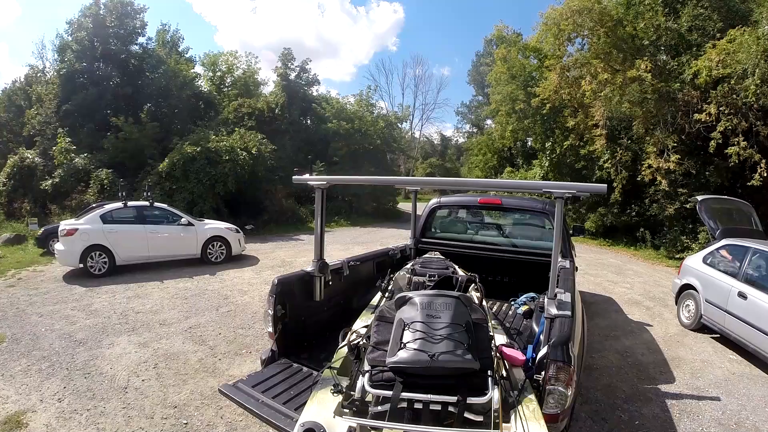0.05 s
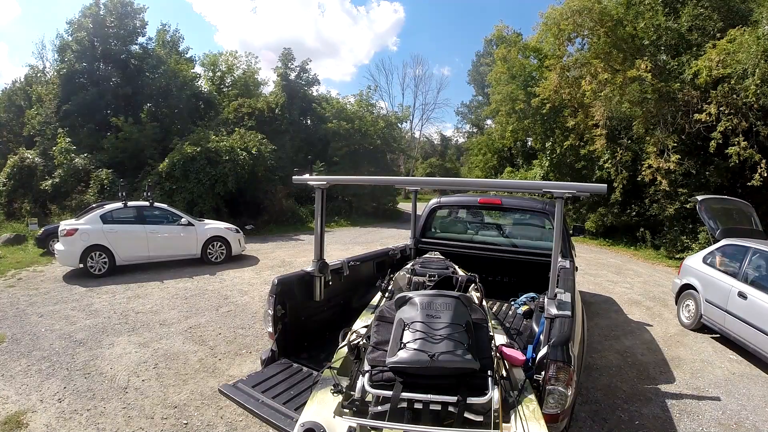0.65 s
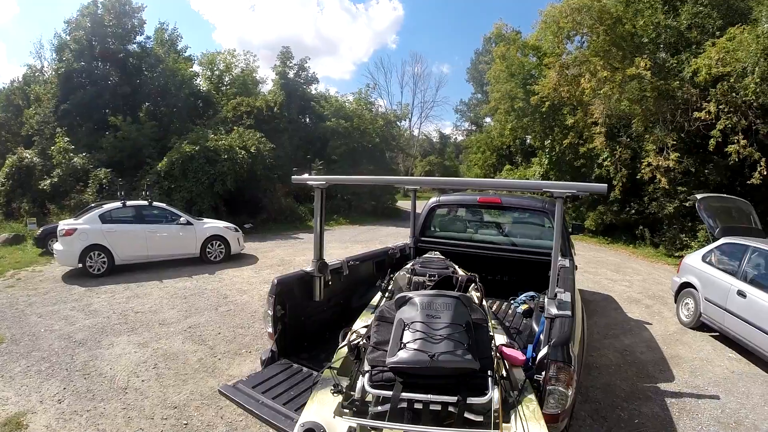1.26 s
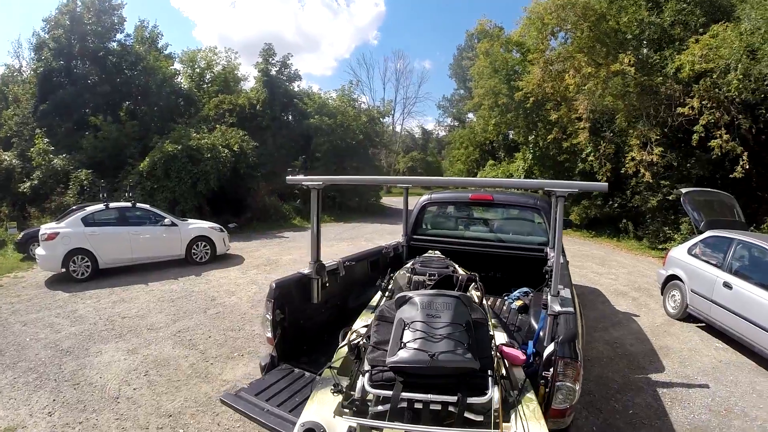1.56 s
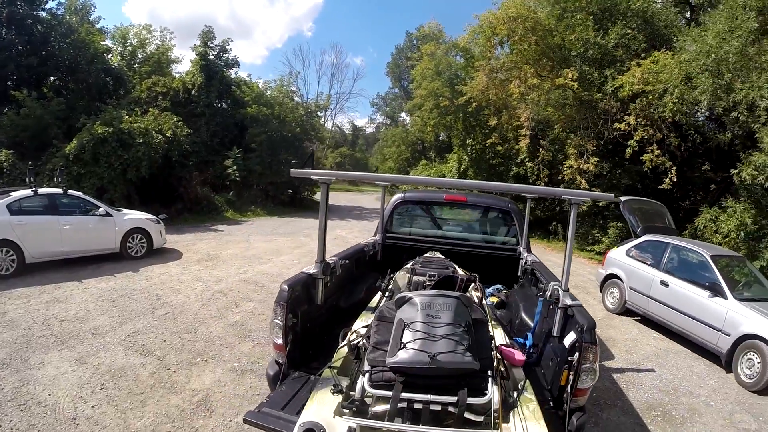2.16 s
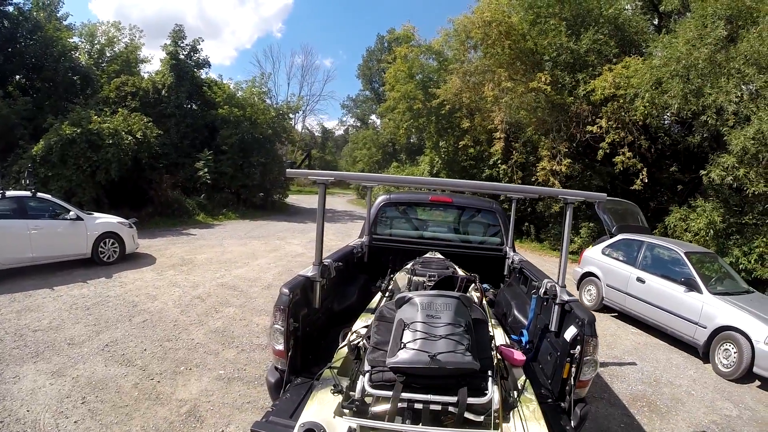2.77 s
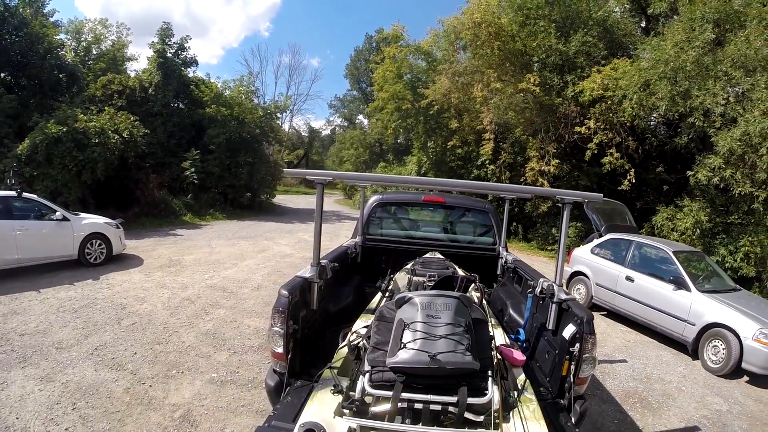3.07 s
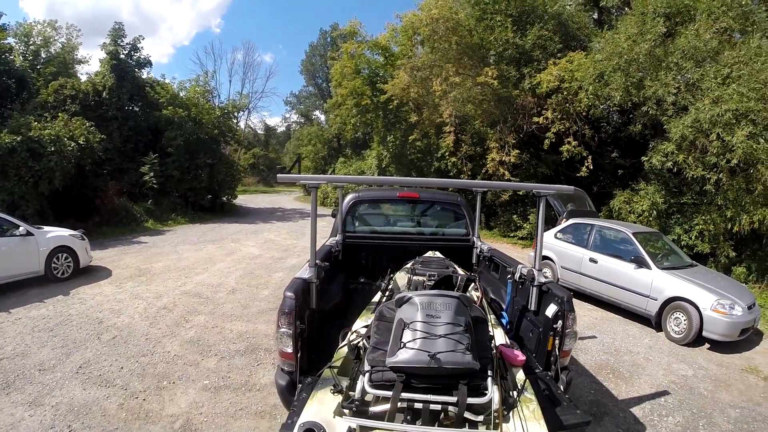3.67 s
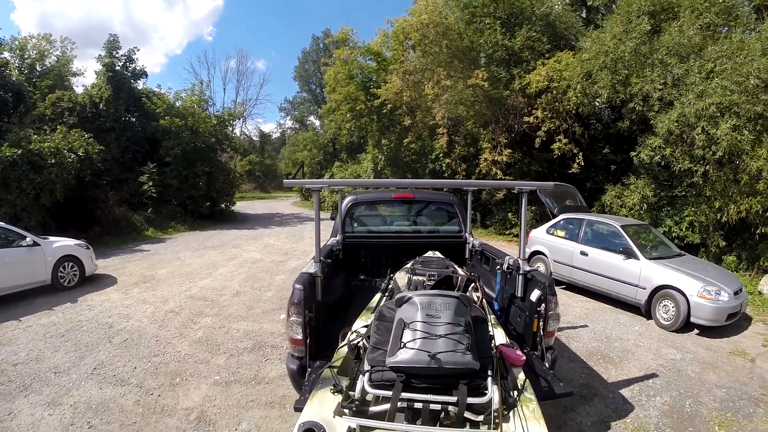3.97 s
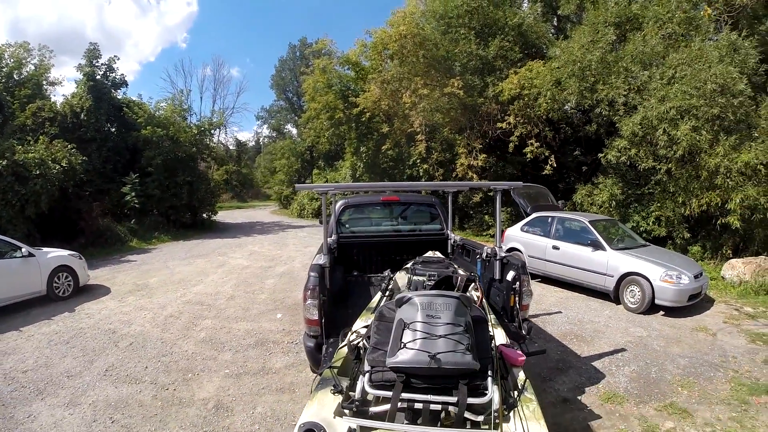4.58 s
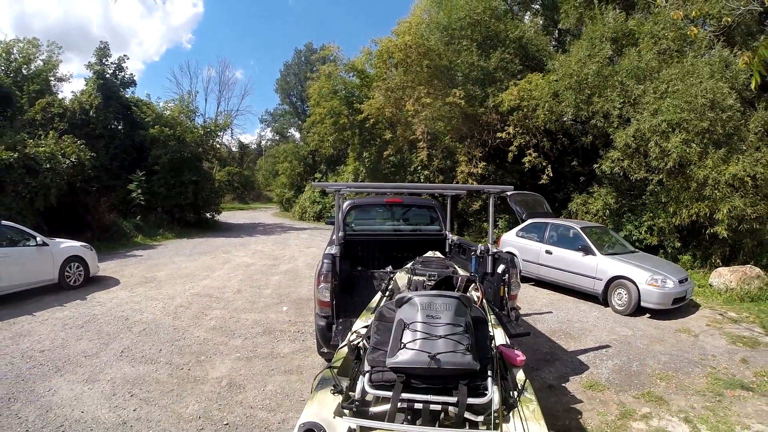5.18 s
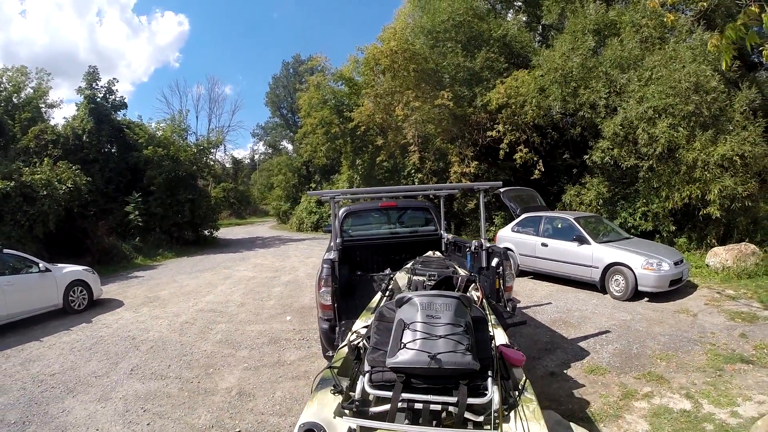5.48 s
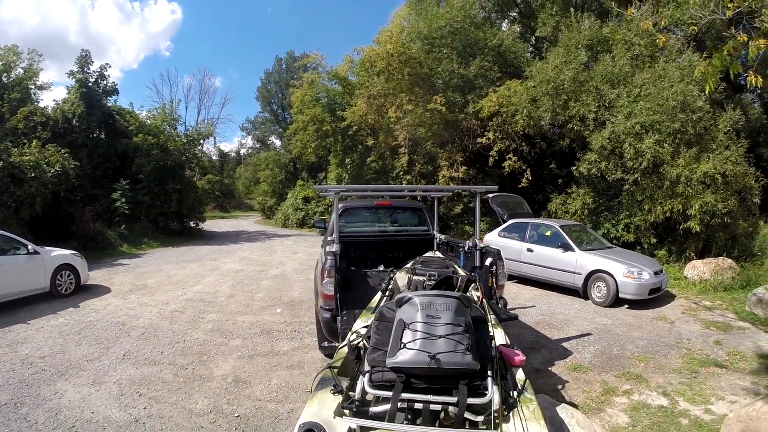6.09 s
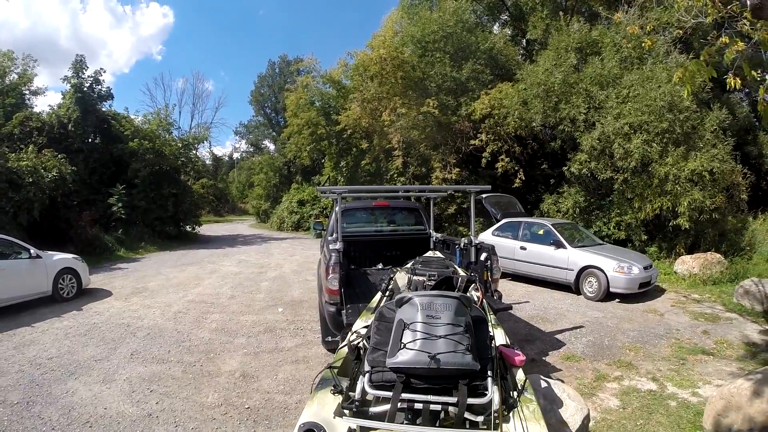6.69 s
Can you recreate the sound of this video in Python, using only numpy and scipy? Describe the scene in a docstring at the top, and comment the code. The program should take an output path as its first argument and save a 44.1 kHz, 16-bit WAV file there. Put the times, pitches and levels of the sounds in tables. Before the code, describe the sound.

A hollow plastic kayak is dragged off a pickup bed, rumbling and scraping with uneven bumps and knocks.

```python
"""A plastic kayak is pulled backwards off a pickup's ribbed bed, heard from its hollow hull.
Over a faint hiss come a few soft bumps, a clinking buckle and a thin squeak. Near 2 s a short tug
sets the hull booming and the deck fittings cracking. At 3.3 s the keel catches and rasps, then the
long pull begins: grit scrapes, the thin walls sing, the hull groans and loose gear knocks.
After 5 s the slide eases off, and a last hard bump lands near 6.8 s."""
import sys
import numpy as np
from scipy import signal
from scipy.fft import rfft, irfft
from scipy.io import wavfile
from scipy.ndimage import uniform_filter1d

SR = 44100
rng = np.random.default_rng(int(sys.argv[2]) if len(sys.argv) > 2 else 0)


def store_wav(level_fs):
    """Save 16-bit WAV to argv[1]."""
    pcm = np.round(np.clip(np.atleast_2d(level_fs), -1, 1) * 32767)
    wavfile.write(sys.argv[1], SR, pcm.T.astype(np.int16))


N = 301644

# colour of the background hiss: (frequency [Hz], relative level [dB])
HISS_COLOUR = [(60, 13.5), (280, -3.5), (420, -4), (750, -12), (1050, -10.5), (1900, -12), (2900, -16),
               (3500, -18), (6500, -23), (8200, -27), (12500, -31.5), (15000, -44)]
# fader ride of the hiss: (time [s], level [dB])
HISS_LEVEL = [(0.0, -51), (1.99, -51), (2.05, -63.5), (2.35, -58), (2.75, -51), (6.84, -50.5)]
# thin tones in the hiss: (frequency [Hz], width [Hz], highest level [dB])
HISS_TONES = [(2580, 200, -72.5), (5005, 77, -77), (10110, 230, -81)]
# a small metal buckle clinks: (time [s], peak [dB])
BUCKLE_HITS = [(0.0774, -44), (0.571, -55), (0.635, -40)]
# the buckle's ring: (frequency [Hz], relative level [dB], t60 [s])
BUCKLE_MODES = [(2200, -10, 0.085), (2540, -0.5, 0.05)]
# sharp, dry ticks at the hardest jolts: (time [s], peak [dB])
JOLT_TICKS = [(1.956, -33), (1.975, -33), (1.997, -30.5), (2.012, -46), (2.021, -30), (6.76, -34.5)]
# ring of the thin hull walls: (frequency [Hz], width [Hz], relative level [dB])
WALL_TONES = [(562, 65, -1), (1013, 85, 0.5), (1860, 98, -9), (2026, 40, -9.5), (2520, 110, -15)]
# how strongly the walls sing: (time [s], relative level [dB])
WALL_LEVEL = [(0.62, -81), (0.645, -51), (0.76, -70), (1.25, -72.5), (1.7, -46.5), (2.04, -49.5),
              (2.15, -55.5), (2.9, -65.5), (3.5, -47), (4.0, -38), (4.3, -48.5), (4.62, -41.5), (4.9, -42),
              (5.25, -54), (6.3, -59.5), (6.7, -60)]
# the keel bites and groans: (crest time [s], swell time [s], pitch [Hz], crest level [dB])
KEEL_GROANS = [(1.687, 0.088, 259, -31.5), (1.739, 0.015, 1860, -39), (1.782, 0.025, 477, -34.5),
               (1.819, 0.062, 242, -29), (1.944, 0.022, 3330, -51.5), (2.032, 0.047, 397, -35),
               (2.511, 0.043, 174, -20), (2.518, 0.044, 2020, -54), (2.519, 0.034, 3240, -56.5),
               (3.21, 0.11, 280, -41.5), (3.491, 0.048, 2530, -42.5), (3.548, 0.017, 2150, -37.5),
               (3.669, 0.027, 1880, -41.5), (3.913, 0.078, 960, -30.5), (3.914, 0.11, 1950, -38),
               (4.003, 0.085, 152, -17), (4.07, 0.11, 1840, -42.5), (4.256, 0.06, 1850, -49.5),
               (4.33, 0.072, 142, -16), (4.679, 0.041, 336, -29), (4.855, 0.016, 860, -27),
               (4.876, 0.071, 1900, -42), (5.031, 0.031, 1890, -42), (5.5, 0.14, 166.5, -28.5),
               (6.182, 0.17, 2260, -55)]
# the keel catches and rasps: (time [s], hold [s], drive [dB])
KEEL_RASPS = [(1.714, 0.011, -46), (1.723, 0.014, -44.5), (3.324, 0.0045, -42), (3.343, 0.0068, -40),
              (3.363, 0.011, -38), (3.387, 0.042, -38), (3.447, 0.08, -37), (5.268, 0.0082, -46.5),
              (5.549, 0.065, -49.5), (5.73, 0.071, -53), (6.463, 0.026, -47.5)]
# firmness of the slide, a short tug then the long pull: (time [s], relative level [dB])
SCRAPE_LEVEL = [(1.15, -59.5), (1.4, -57), (1.74, -38), (1.86, -46), (2.08, -52), (2.8, -58), (3.25, -49.5),
                (3.53, -30.5), (3.65, -35), (3.82, -36.5), (3.9, -33.5), (4.1, -33), (4.25, -41.5),
                (4.5, -35), (4.64, -33.5), (4.72, -42), (4.8, -30), (4.89, -30.5), (4.97, -44), (5.04, -39),
                (5.15, -39.5), (5.21, -41.5), (5.45, -46.5), (5.6, -45), (5.86, -54.5), (6.2, -45.5),
                (6.48, -45.5), (6.72, -53)]
# bright grit on top of the scrape: (time [s], relative level [dB])
GRIT_LEVEL = [(1.8, -21), (2.8, -4), (3.55, -23.5), (3.8, -14.5), (4.3, -18.5), (4.9, -23), (6.4, -18.5)]
# groups of hull modes that the scrape feeds: (band edge [Hz])
SCRAPE_EDGES = [386, 694, 1340, 1610, 2270]
# stiff deck fittings: (frequency [Hz], base level [dB], base t60 [s])
FITTING_MODES = [(1176, 13.5, 0.06), (1880, 6.5, 0.024), (2084, 1, 0.041), (2790, -2, 0.0078),
                 (3000, -7.5, 0.013), (4120, -22, 0.0096), (6620, -38.5, 0.0097)]
# hard knocks of hull and gear: (time [s], hull ring peak [dB], fitting crack peak [dB])
HARD_KNOCKS = [(0.094, -57, -43), (0.168, -64.5, -35.5), (0.634, -34.5, -45), (0.642, -30, -44),
               (1.897, -27.5, -50), (1.915, -25.5, -35), (1.973, -22, -43.5), (2.0139, -16.5, -14),
               (2.058, -43, -51), (2.747, -37, -44.5), (3.613, -23, -45), (3.76, -28.5, -34),
               (3.912, -17, -41), (4.313, -28, -50), (4.585, -29, -44), (4.657, -33, -50),
               (4.838, -22.5, -43.5), (4.890, -20, -40), (5.009, -22, -47), (5.043, -28.5, -47),
               (5.112, -29, -53), (6.7432, -31, -39), (6.7563, -21, -27), (6.769, -31.5, -38)]
# the hull drops against the bed: (time [s], peak [dB], top of the thud's band [Hz])
HULL_BUMPS = [(0.077, -21, 41), (0.078, -27, 152), (0.572, -20, 111), (0.637, -18, 243), (0.66, -21, 111),
              (1.244, -17, 151), (1.638, -11.5, 102), (1.662, -5, 179), (1.715, -5, 65.7),
              (1.807, -3.5, 96), (1.896, -1, 153), (2.014, -3.5, 336), (2.472, -17, 257),
              (2.568, -16.5, 76), (2.671, -20.5, 62), (2.923, -21.5, 152), (3.352, -8.5, 130),
              (3.392, -4.5, 218), (3.462, -5, 239), (3.623, -5.5, 192), (3.724, -8, 140),
              (3.741, -4.5, 158), (3.768, -10.5, 110), (4.058, -3.5, 171), (4.099, -7.5, 107),
              (4.163, -9, 130), (4.325, -9, 135), (4.418, -13.5, 74.6), (4.481, -11, 99), (4.616, -10, 110),
              (4.765, -13.5, 161), (4.857, -1.5, 164), (4.899, -5.5, 137), (5.154, -16, 70),
              (5.273, -10.5, 102), (5.602, -13.5, 163), (6.171, -14, 117), (6.341, -15.5, 154),
              (6.746, -10.5, 197), (6.763, -1.5, 173)]
# the hull's weight shaking on its support: (time [s], relative level [dB])
RUMBLE_LEVEL = [(0.08, -38), (0.33, -56), (0.55, -68), (0.62, -28), (0.86, -47.5), (1.19, -50), (1.28, -36),
                (1.61, -21), (1.68, -16), (2.0, -12), (2.11, -20.5), (2.22, -29), (2.33, -30),
                (2.53, -24.5), (2.71, -32.5), (2.77, -35), (2.98, -33), (3.1, -32), (3.42, -17.5),
                (3.58, -18), (4.1, -20), (4.73, -23), (4.9, -17), (5.22, -28.5), (5.45, -26), (5.97, -31),
                (6.25, -27.5), (6.7, -31)]
# resonances of the hollow hull: (frequency [Hz], width [Hz], gain [dB])
HULL_MODES = [(45.7, 8.4, 4), (62.6, 14, 4), (86.4, 41, -5), (117.4, 15, -2), (149.2, 39.2, 2.5),
              (198, 390, -28), (228, 29, -14.5), (280.4, 52, -11), (337.6, 24.8, -11.5), (440, 650, -28),
              (550, 98, -23), (579, 22, -19), (660, 60, -20), (766.4, 54, -23.5), (847, 67, -29),
              (957, 72, -23.5), (1047, 160, -23.5), (1217, 250, -33), (1472, 220, -32), (1879, 150, -31),
              (2056, 97, -35.5), (2166, 160, -38.5), (2525, 180, -38.5), (2870, 410, -46.5),
              (3450, 1100, -54), (4700, 3000, -60), (6400, 1600, -77)]

CUTOFF_HZ = 15000
TICK_LOW_HZ, TICK_DULL_HZ, TICK_TOP_HZ = 450, 1100, 10500
WALL_SURGE_DB, WALL_SURGES_PER_S = 3.5, 6.8
GROUP_SURGE_DB, GROUP_SURGES_PER_S = 1.5, 11   # mode groups surge as the point of contact wanders
SCRAPE_JERK_DB, JERKS_PER_S = 1.3, 12   # the whole scrape comes in small jerks
FLEX_DB, BOOM_DB, PANEL_DB = -5, -4, -5   # trims of the three rumble layers
PANEL_BOOM_SHARE = 0.34   # how far the deck panels follow the boom rather than the scrape
MID_PULL_S, FREEING_DB_PER_S = 3.48, 1.28   # as the hull leaves the bed it flexes less and booms more
FLEX_WOBBLE_DB, BOOM_WOBBLE_DB, WOBBLES_PER_S = 4, 2.5, 9.9   # uneven ride over the ribs


def from_db(db):
    """Decibels to gain."""
    return 10 ** (np.asarray(db) / 20)


def rms_one(x):
    """Scale to unit power."""
    return x / np.sqrt(np.mean(x ** 2) + 1e-20)


def peak_one(x):
    """Scale to unit peak."""
    return x / (np.abs(x).max() + 1e-20)


def fader(rows):
    """Join (time, level) points into a level at every sample."""
    return np.interp(np.arange(N) / SR, *np.transpose(rows))


def band(x, low_hz, high_hz, order=3):
    """Causal band-pass."""
    sos = signal.butter(order, [low_hz, min(high_hz, SR / 2 - 100)], "band", fs=SR, output="sos")
    return signal.sosfilt(sos, x + 1e-18)


def drift(rate_hz):
    """Smooth random modulation with a spread of 1."""
    hop, settle = 40, 2000
    pole = np.exp(-2 * np.pi * hop * rate_hz / SR)
    noise = rng.standard_normal(N // hop + settle + 2)
    slow = signal.lfilter([1], [1, -2 * pole, pole * pole], noise)[settle:]
    return np.interp(np.arange(N) / hop, np.arange(len(slow)), rms_one(slow))


def steady(x, window_s):
    """Level to unit power over each short stretch; faster flutter stays."""
    size = max(int(window_s * SR), 2)
    power = uniform_filter1d(uniform_filter1d(x ** 2, size), size)
    return x / np.sqrt(np.abs(power) + 1e-20)


def add(out, s, sound):
    """Mix a sound in at time s."""
    start = max(round(s * SR), 0)
    out[start:start + len(sound)] += sound[:max(N - start, 0)]


def grains(per_s, spread_db):
    """Tiny slips at random moments, most small and a few large."""
    sizes = from_db(spread_db * np.minimum(rng.exponential(1, N), 4)) * rng.choice([-1, 1], N)
    return sizes * (rng.random(N) < per_s / SR)


def hull_ring(size=16384):
    """The hull's answer to one click: its damped modes, made causal by minimum phase."""
    hz = np.arange(size // 2 + 1) * SR / size
    power = sum((from_db(db) / (1 + (2 * (hz - centre) / width) ** 2)) ** 2
                for centre, width, db in HULL_MODES)
    cepstrum = irfft(np.log(power) / 2)
    cepstrum[1:size // 2] *= 2
    cepstrum[size // 2 + 1:] = 0
    return irfft(np.exp(rfft(cepstrum)))


def through(ring, force):
    """A force on the keel as the hull passes it on."""
    return signal.fftconvolve(force, ring)[:N]


def air():
    """Smooth outdoor hiss with a few thin tones; it dips after the jolts near 2 s."""
    hz = np.arange(N // 2 + 1) * SR / N
    points_hz, colour_db = np.transpose(HISS_COLOUR)
    colour = from_db(np.interp(np.log(hz + 1), np.log(points_hz), colour_db))
    hiss = rms_one(irfft(rfft(rng.standard_normal(N)) * colour, N))
    tones = sum(from_db(db) * rms_one(band(rng.standard_normal(N), f - width / 2, f + width / 2, 1))
                for f, width, db in HISS_TONES)
    level_db = fader(HISS_LEVEL)
    return from_db(level_db) * hiss + from_db(level_db - level_db.max()) * tones


def squeak():
    """A faint, wavering tone before the first tug."""
    envelope = np.interp(np.arange(N) / SR, [.78, .84, 1.05, 1.2], [0, 1, 1, 0])
    tone = steady(band(rng.standard_normal(N), 744, 800, order=2), window_s=0.064)
    return from_db(-64.5) * envelope * tone


def clinks():
    """Each touch rings the two modes of a metal buckle."""
    out, t = np.zeros(N), np.arange(SR // 2) / SR
    tone = sum(from_db(db - 60 * t / t60) * np.sin(2 * np.pi * hz * t) for hz, db, t60 in BUCKLE_MODES)
    for s, db in BUCKLE_HITS:
        add(out, s, from_db(db) * peak_one(tone))
    return out


def ticks():
    """Single hard clicks, too brief to set anything ringing."""
    out = np.zeros(N)
    dulled = band(signal.unit_impulse(512), TICK_LOW_HZ, TICK_DULL_HZ, order=1)
    click = peak_one(band(dulled, 200, TICK_TOP_HZ, order=4))
    for s, db in JOLT_TICKS:
        add(out, s, from_db(db) * click)
    return out


def walls(ring_db):
    """Slips keep the lightly damped wall modes singing, each in surges of its own."""
    modes = np.zeros(N)
    for hz, width, db in WALL_TONES:
        gain = from_db(db + WALL_SURGE_DB * drift(WALL_SURGES_PER_S))
        slips = grains(per_s=900, spread_db=2.5)
        modes += gain * rms_one(band(slips, hz - width / 2, hz + width / 2, order=1))
    return from_db(ring_db) * rms_one(band(modes, 350, 2900))


def groans(ring):
    """Each bite of the keel swells and fades as rough slips feed a narrow group of hull modes."""
    out, slips = np.zeros(N), through(ring, grains(per_s=2400, spread_db=2.5))
    for s, swell_s, hz, db in KEEL_GROANS:
        at = np.arange(max(int((s - 2 * swell_s) * SR), 0), min(int((s + 2 * swell_s) * SR), N))
        swell = np.exp(-2 * ((at / SR - s) / swell_s) ** 2)
        tone = steady(band(slips[at], hz / 1.145, hz * 1.116, order=2), window_s=0.0037)
        out[at] += from_db(db) * swell * tone
    return out


def rasps(ring):
    """Plastic catches on plastic: bursts of fast, nearly regular stick-slip pulses ring the hull."""
    t = np.arange(N) / SR
    slips_per_s = 340 * from_db(2 * drift(100))
    slips_done = np.floor(np.cumsum(slips_per_s) / SR)
    pulses = np.diff(slips_done, prepend=0) * from_db(1.2 * drift(200))
    grip = sum(from_db(db - 60 * np.maximum(t - s - hold_s, 0) / 0.024) * (t >= s)
               for s, hold_s, db in KEEL_RASPS)
    treble_gain = np.sqrt(np.sum(band(ring, 2174, 3700) ** 2))
    rung = through(ring, grip * rms_one(pulses)) / treble_gain
    bright = band(band(rung, 2020, 4400, order=2), 1000, 3800, order=7)
    hollow = band(rung, 530, 1400, order=2)
    return from_db(-8) * bright + from_db(-14.5) * hollow


def scrape(ring, scrape_db, grit_db):
    """Grit sticks and slips under the keel; the pressure flutters and the point of contact wanders."""
    slips = [through(ring, grains(per_s=2600, spread_db=2.0)) for _ in range(2)]
    body = sum(from_db(GROUP_SURGE_DB * drift(GROUP_SURGES_PER_S)) * band(slips[k % 2], low, high)
               for k, (low, high) in enumerate(zip(SCRAPE_EDGES, SCRAPE_EDGES[1:])))
    grit = steady(band(slips[0], 2360, 8100), window_s=0.16)
    firm = 1 / (1 + from_db(-54.5 - scrape_db) ** 2)   # fine grit only sings out under firm sliding
    pressure = from_db(scrape_db - 2.85 + SCRAPE_JERK_DB * drift(JERKS_PER_S))
    return pressure * (steady(body, window_s=0.063) + firm * from_db(grit_db + 4.8) * grit)


def fitting_crack(t, weight):
    """Struck deck fittings: light taps are short and bright, heavy blows ring longer and duller."""
    crack = np.zeros(len(t))
    strengths = from_db(rng.normal(0, 1, len(FITTING_MODES)))
    for k, (hz, db, t60) in enumerate(FITTING_MODES):
        tilt_db = 10 * (2.5 - weight) * np.log2(hz / 2000)
        decay_db = 60 * t / (t60 * (0.79 + 0.15 * weight))
        crack += (-1) ** k * strengths[k] * from_db(db + tilt_db - decay_db) * np.sin(2 * np.pi * hz * t)
    return band(crack, 500, 7600 - 3300 * weight, order=6)


def knocks(ring):
    """A hard contact buzzes briefly, rings the upper hull modes and cracks in the fittings."""
    out, t = np.zeros(N), np.arange(len(ring)) / SR
    for s, ring_db, crack_db in HARD_KNOCKS:
        buzz = 0.11 * rng.standard_normal(len(t)) * from_db(-60 * t / 0.063)
        rung = through(ring, (t == 0) + buzz)[:len(t)]
        add(out, s, from_db(ring_db) * peak_one(band(rung, 350, 2900)))
        weight = np.clip((ring_db + 46) / 25, 0, 1)
        add(out, s, from_db(crack_db) * peak_one(fitting_crack(t, weight)))
    return out


def bumps(ring):
    """Soft, heavy contacts reach only the low modes; firmer ones favour the hollow boom."""
    out = np.zeros(N)
    for s, db, top_hz in HULL_BUMPS:
        low_hz = np.clip(0.29 * top_hz, 25, 0.7 * top_hz)
        add(out, s, from_db(db) * peak_one(band(ring, low_hz, top_hz, order=2)))
    return out


def rumble(ring, rumble_db, scrape_db):
    """Uneven sliding flexes the whole hull, booms in its air space and shakes its deck panels."""
    freed_db = FREEING_DB_PER_S * (np.arange(N) / SR - MID_PULL_S)
    flex_db = rumble_db + FLEX_DB - freed_db + FLEX_WOBBLE_DB * drift(WOBBLES_PER_S)
    boom_db = rumble_db + BOOM_DB + freed_db + BOOM_WOBBLE_DB * drift(WOBBLES_PER_S)
    panel_db = PANEL_DB + PANEL_BOOM_SHARE * boom_db + (1 - PANEL_BOOM_SHARE) * scrape_db
    shake = through(ring, grains(per_s=980, spread_db=3.5))
    judder = through(ring, grains(per_s=700, spread_db=5))
    flex = from_db(flex_db) * steady(band(shake, 36, 90.5), window_s=0.013)
    boom = from_db(boom_db) * steady(band(judder, 91.6, 213.3), window_s=0.034)
    panels = from_db(panel_db) * steady(band(shake, 240, 403, order=4), window_s=0.52)
    return flex + boom + panels


def scene():
    """The mono mix: the hull's slide, hits and rasps over a bed of hiss."""
    t, ring = np.arange(N) / SR, hull_ring()
    scrape_db = fader(SCRAPE_LEVEL)
    low_end = rumble(ring, fader(RUMBLE_LEVEL), scrape_db)
    rubbing = scrape(ring, scrape_db, fader(GRIT_LEVEL)) + walls(fader(WALL_LEVEL))
    # as the long pull starts the keel sticks between rasps, and the rubbing ducks
    sticking = from_db(np.interp(t, [3.28, 3.32, 3.45, 3.49], [0, -6, -13, 0]))
    sliding = low_end + sticking * rubbing + groans(ring)
    fade_in = np.interp(t, [.072, .08], [0, 1])
    hits = bumps(ring) + knocks(ring) + clinks() + ticks()
    return (fade_in * sliding + hits + rasps(ring) + squeak() + air())[None]


def record(dry):
    """Soft-clip the tallest peaks and roll off the top."""
    rounded = dry / (1 + (dry / .92) ** 6) ** (1 / 6)
    return signal.sosfilt(signal.butter(14, CUTOFF_HZ, fs=SR, output="sos"), rounded)


dry = scene()
out = record(dry)
store_wav(out)
```